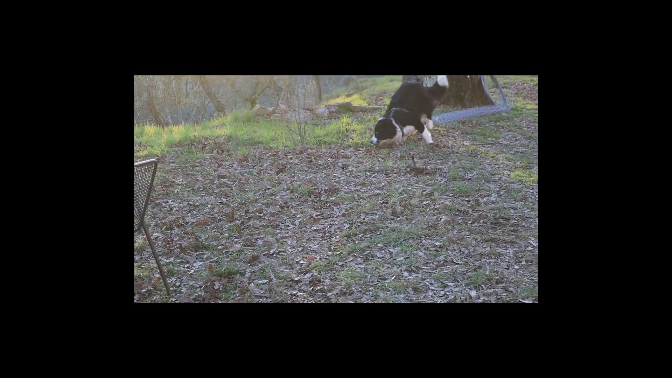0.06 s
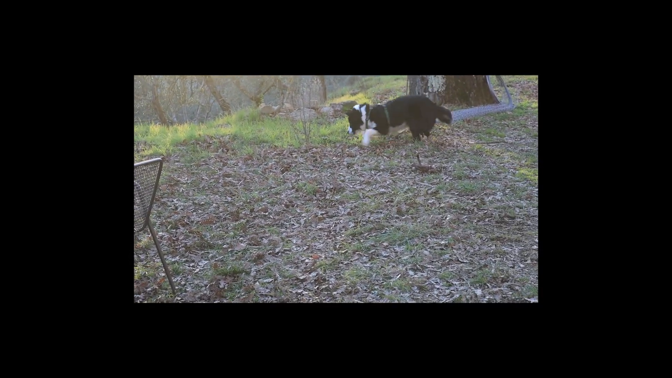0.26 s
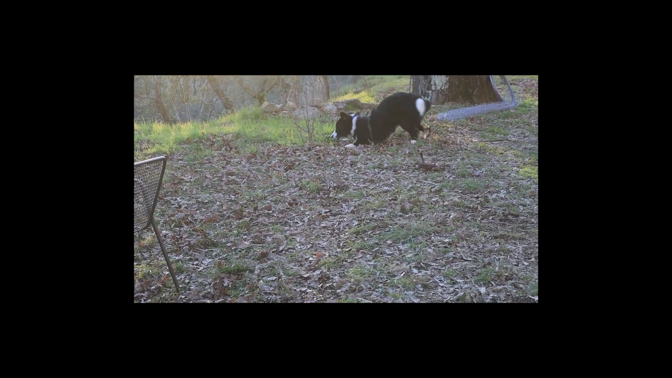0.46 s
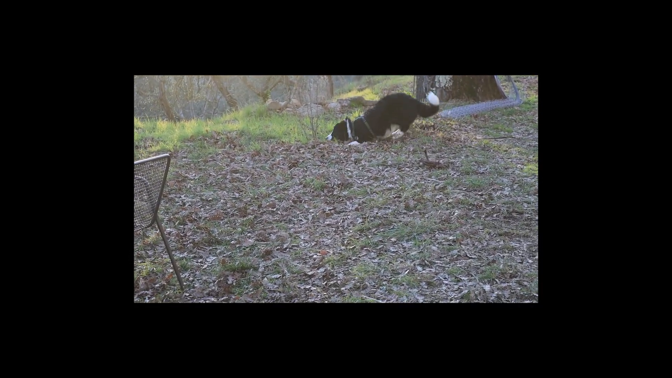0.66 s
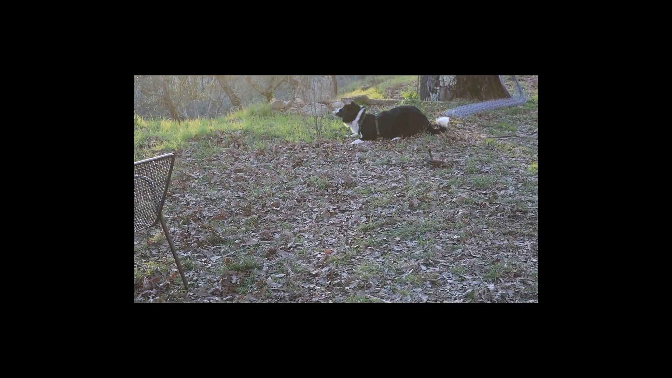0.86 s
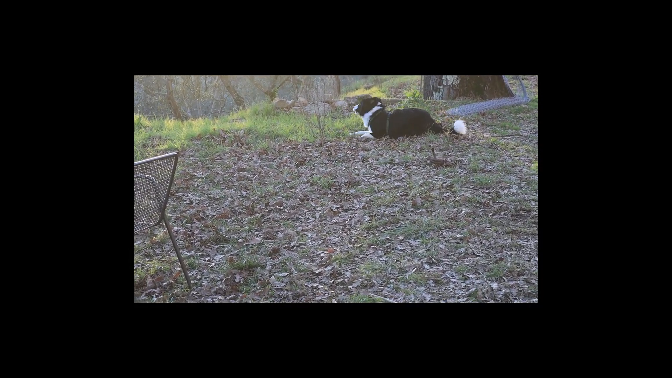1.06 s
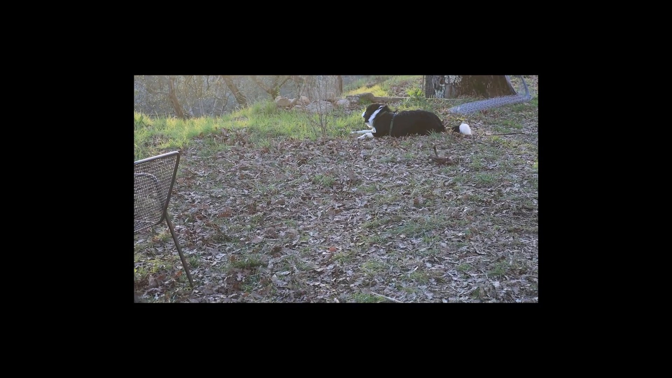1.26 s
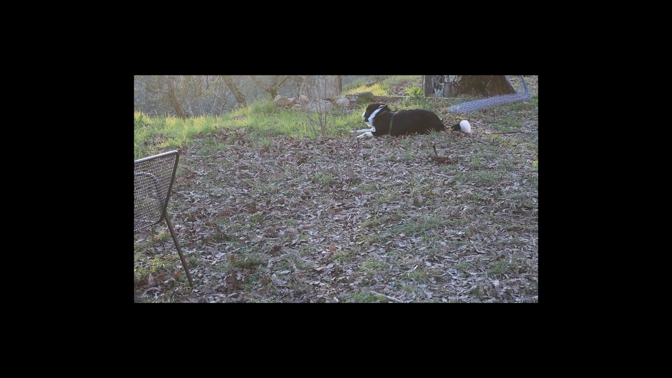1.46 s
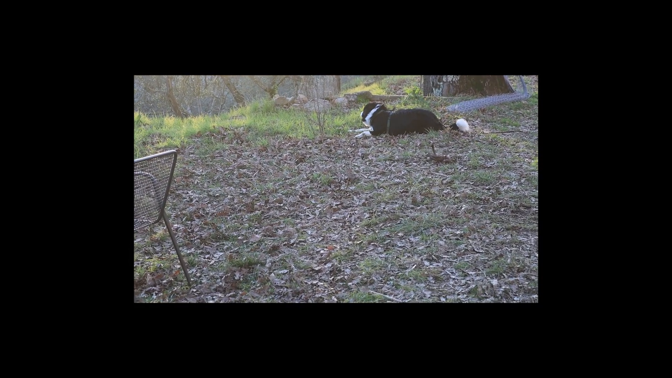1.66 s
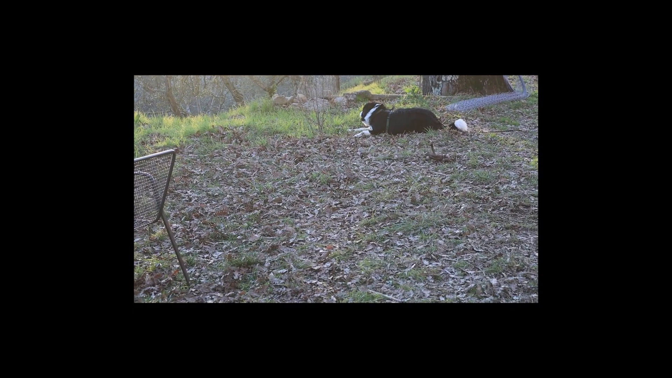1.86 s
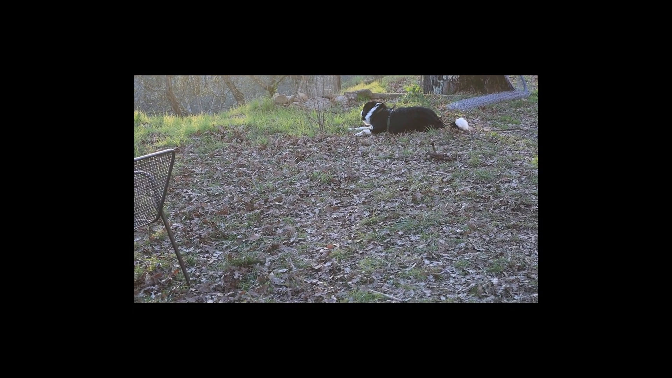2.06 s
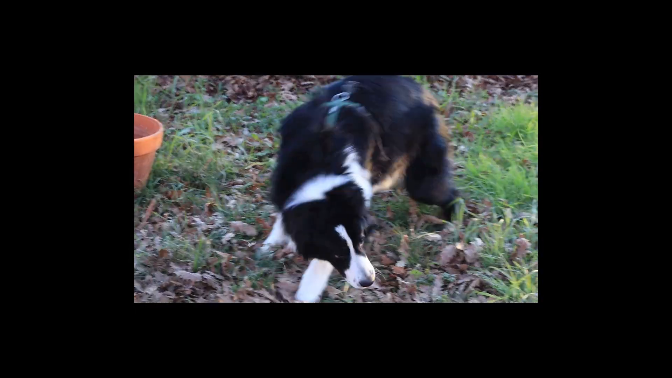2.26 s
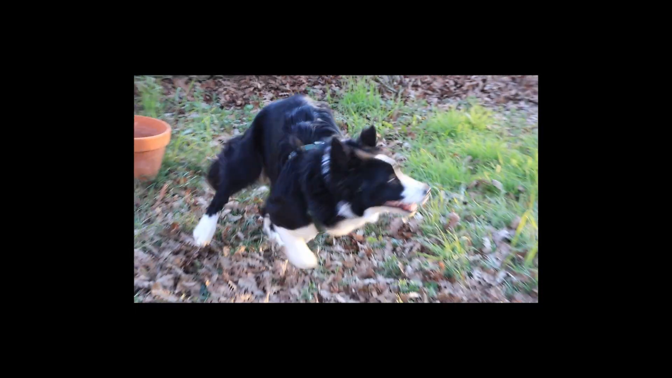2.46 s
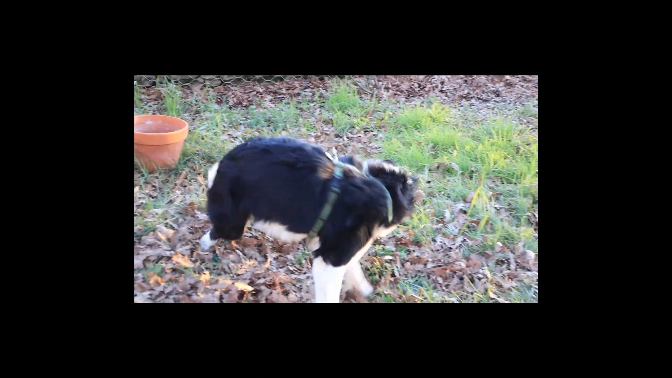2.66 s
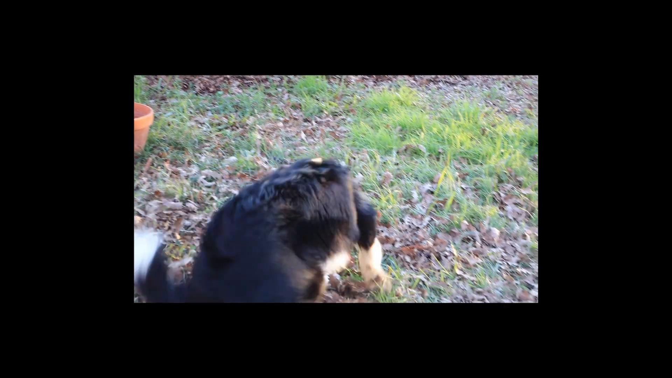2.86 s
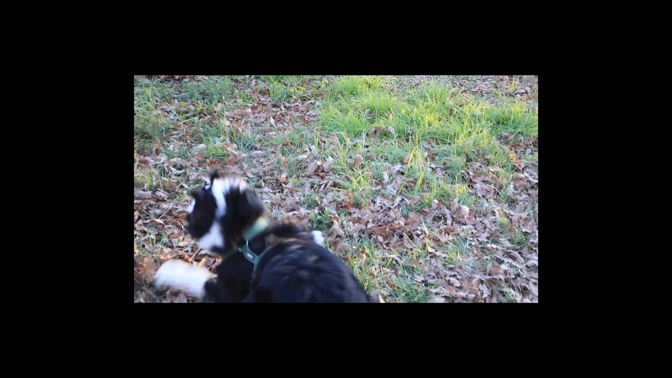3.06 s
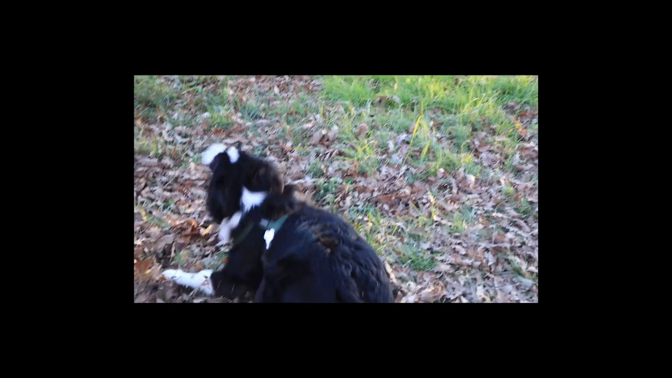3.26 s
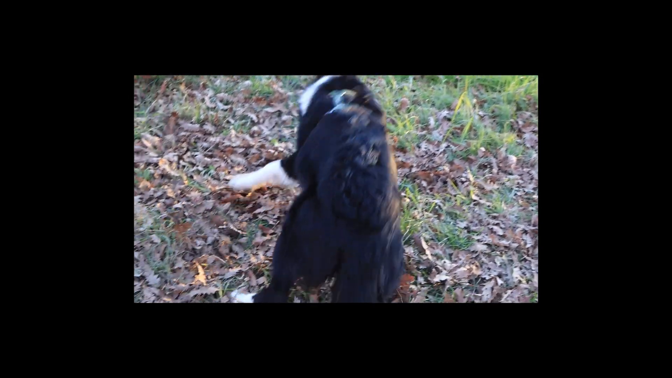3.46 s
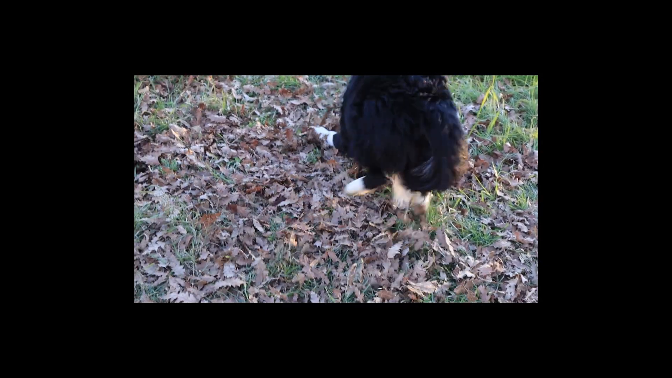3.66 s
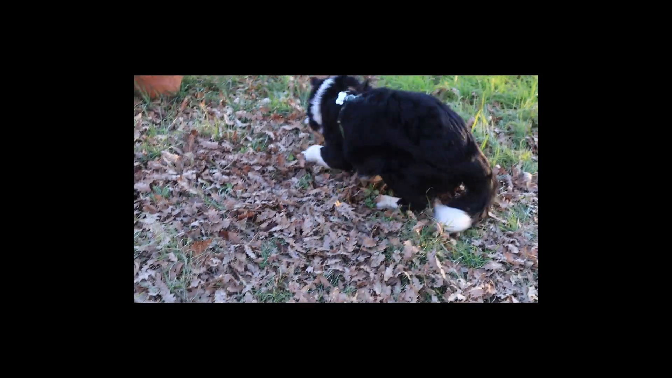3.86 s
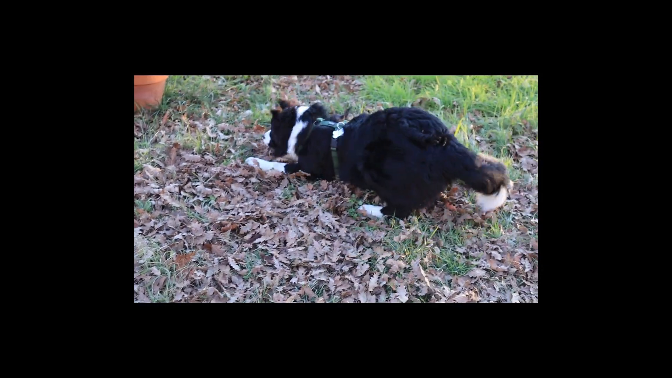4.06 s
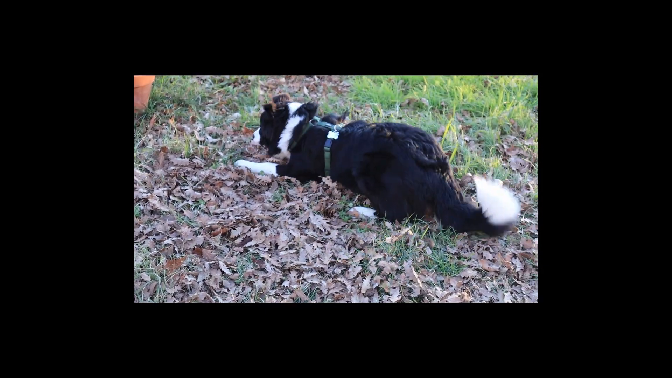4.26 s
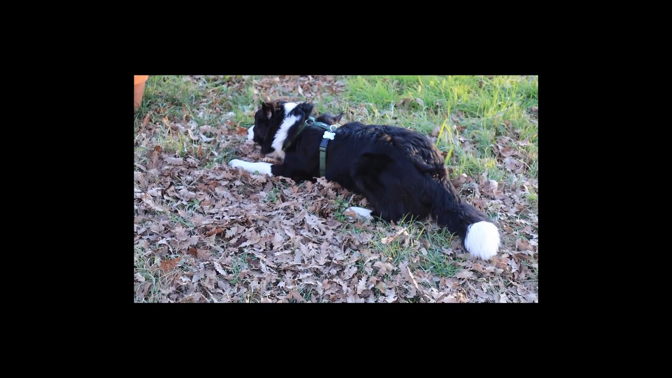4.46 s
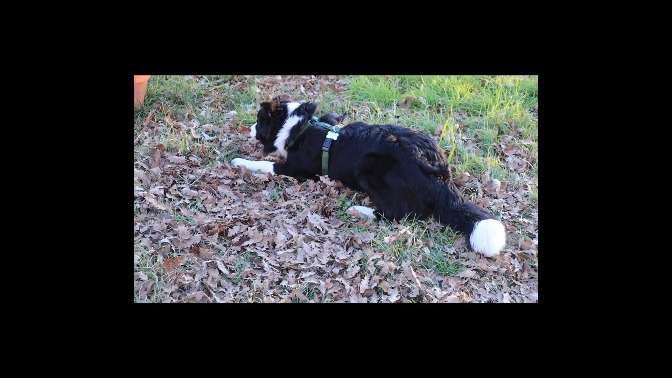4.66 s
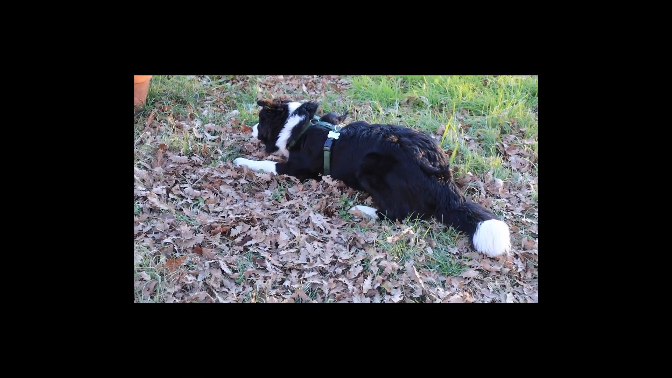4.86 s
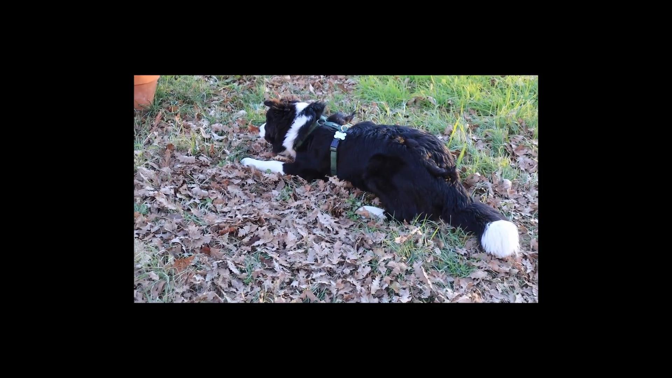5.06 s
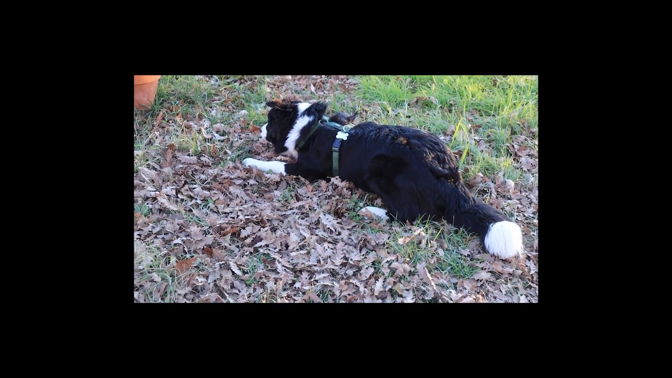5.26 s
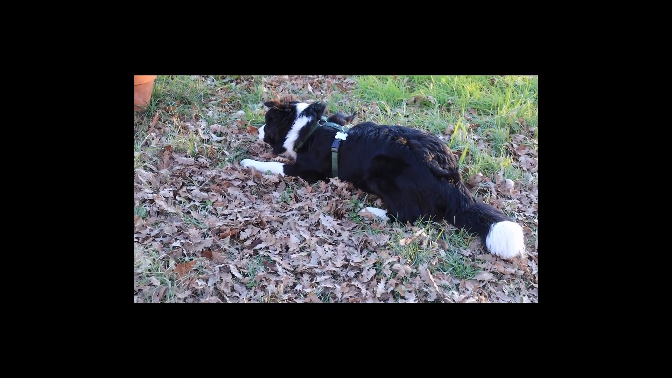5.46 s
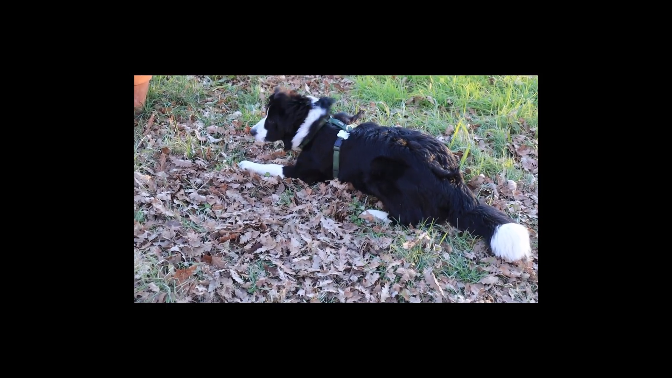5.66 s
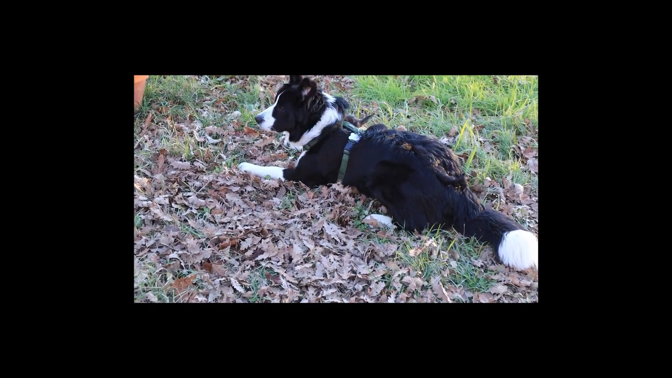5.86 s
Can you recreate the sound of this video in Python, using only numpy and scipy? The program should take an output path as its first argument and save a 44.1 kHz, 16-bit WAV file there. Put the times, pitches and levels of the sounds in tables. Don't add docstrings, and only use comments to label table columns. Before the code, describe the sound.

A quiet garden with soft airy hiss and low wind buffeting. From 0 to about 1.4 s a distant dog's paws scuff dry leaves in soft, uneven swishes, strongest at the start, then it lies still. Around 1.7 s two quick hollow knocks come from far away, briefly resonant and soon damped. At 2.25 s the perspective jumps close: dense, bright, crackling leaf scrambling in irregular bursts, with sharp snaps near 2.85 s. Paws hit the microphone stand at 2.55 and, harder, 2.63 s, making dry cracks and a low shudder. Small metal tags clink, clearest at 2.8 and 3.3 s, again softly near 4.07 s with a low thud. Crisp snaps accompany settling at 4.1-4.45 s. Then near stillness: tiny leaf ticks and a faint, wavering low coo, dropping in pitch, from 4.5 to 5.2 s. A louder tick at 5.7 s and a light rustle end it.

```python
import sys
import numpy as np
from scipy import signal
from scipy.io import wavfile
from scipy.ndimage import uniform_filter1d

SR = 44100
rng = np.random.default_rng(int(sys.argv[2]) if len(sys.argv) > 2 else 0)


def unload_audio(sound):
    columns = np.transpose(np.atleast_2d(sound))
    steps = np.round(np.clip(columns, -1, 1) * 32767)
    wavfile.write(sys.argv[1], SR, steps.astype(np.int16))


def invert_db(x):
    u = np.asarray(x, float) / 20
    return 10 ** u


N = 260631
NEAR_S = 2.247


def evened(x):
    return x / np.sqrt(np.mean(x ** 2) + 1e-20)


def add(mix, s, sound):
    part = mix[round(s * SR):][:len(sound)]
    part += sound[:len(part)]


def coloured(x, points, undo=0):
    hz = np.abs(np.fft.fftfreq(4096, 1 / SR))
    f, db = np.transpose(points)
    log_gain = np.log(invert_db(np.interp(np.log(hz + 1), np.log(f), db))) - undo
    taps = np.fft.ifft(np.exp(np.conj(signal.hilbert(log_gain)))).real
    return signal.oaconvolve(x, taps[:2048])[:N]


def band(x, lo_hz, hi_hz, order=2):
    return signal.sosfilt(signal.butter(order, [lo_hz, hi_hz], "band", fs=SR, output="sos"), x)


def drift(seconds):
    width = max(round(seconds * SR), 2)
    return evened(uniform_filter1d(uniform_filter1d(rng.standard_normal(N), width), width))


def ring(hz, db, t60):
    t = np.arange(round(t60 * SR)) / SR
    return invert_db(db - 60 * t / t60) * np.sin(2 * np.pi * hz * t)


# [Hz, dB].
AIR_SPECTRUM = [(60, -32.5), (110, -13), (240, -10.5), (450, -12), (1200, -19), (2900, -22.5), (5900, -25),
                (16000, -28)]
# [s, dB].
GUSTS = [(0.0, -61), (0.57, -63), (0.73, -59), (1.23, -56.5), (1.45, -70), (2.05, -61), (2.33, -44),
         (2.85, -44), (3.07, -45), (3.29, -57), (3.4, -41), (3.49, -52), (4.09, -50), (4.2, -55),
         (5.11, -55.5), (5.44, -49.5), (5.7, -52), (5.91, -51)]


def air():
    air_db, rumble_db = -65.5, -62.5
    s, db = np.transpose(GUSTS)
    gusts = np.hypot(invert_db(np.interp(np.arange(N) / SR, s, db)), invert_db(rumble_db))
    wind = evened(band(rng.standard_normal(N), 17.8, 47.8, order=3))
    wind += 0.28 * evened(band(rng.standard_normal(N), 50, 150))
    wind *= gusts * invert_db(1.5 * drift(.06) - 5)
    wash = evened(coloured(rng.standard_normal(N), AIR_SPECTRUM))
    return wind + invert_db(air_db + 0.54 * drift(.1)) * wash


# [s, Hz, dB].
COO_LINE = [
    (4.5, 490, -84),
    (4.62, 495, -73),
    (4.73, 495, -70),
    (4.82, 490, -77),
    (4.87, 410, -80),
    (4.95, 405, -74),
    (5.1, 405, -73),
    (5.25, 400, -84),
]


def coo():
    s, hz, db = np.transpose(COO_LINE)
    t = np.arange(N) / SR
    pitch = np.interp(t, s, hz) * (1 + .012 * drift(.03))
    level = invert_db(np.interp(t, s, db, -140, -140) + 3.7 * drift(0.022))
    return level * np.sin(2 * np.pi * np.cumsum(pitch) / SR)


# [Hz, dB, dB, s].
HOLLOW_MODES = [(458, -3, -20, .7), (350, -12, -8, .08), (620, -11, -1, .09), (685, -3, -6, .12),
                (805, -5, 0, .15), (885, -1, -2, .26), (1023, -17, -9, .12), (1170, -17, -10, .14)]
# [s, dB].
HOLLOW_BLOWS = [
    (1.7205, -53.5),
    (1.788, -54),
]


def hollow():
    damped_s, damping_db_per_s = 1.86, 160
    out, t = np.zeros(N), np.arange(6000) / SR
    for blow, (s, db) in enumerate(HOLLOW_BLOWS):
        rise_s = .008 if blow else .001
        for hz, *mode_db, t60 in HOLLOW_MODES:
            sound = ring(hz, db + mode_db[blow], t60 * 1.25)
            attack = np.minimum(np.arange(len(sound)) / SR / rise_s, 1)
            add(out, s + rng.uniform(0, 0.00394), sound * attack)
    echoes = rng.standard_normal(len(t)) * (rng.random(len(t)) < .02) * invert_db(-60 * t / .25)
    out += invert_db(-6) * signal.oaconvolve(out, echoes / np.linalg.norm(echoes))[:N]
    damping_db = damping_db_per_s * np.maximum(np.arange(N) / SR - damped_s, 0)
    return out * invert_db(2.2 * drift(.006) - damping_db)


# [s, dB, Hz, s, s].
STAND_CRACKS = [(2.5487, -14, 930, 0.001, 0.0093), (2.549, -21, 1460, 0.00047, 0.0038),
                (2.549, -18.5, 9800, 0.0007, 0.011), (2.549, -25, 3510, 0.00088, .008),
                (2.549, -32, 5630, 0.00088, .008), (2.55, -25.5, 477, 0.00093, 0.025),
                (4.8925, -55, 460, 0.0011, 0.022), (2.6297, -11, 11000, 0.00044, 0.02),
                (2.6307, -7.5, 5570, 0.0011, .012), (2.6309, -8, 4000, 0.0011, 0.0076),
                (2.631, -12, 3180, 0.00081, 0.0095), (2.631, -19, 880, 0.00064, 0.024),
                (2.631, -28.5, 550, 0.00053, 0.038), (2.631, -19.5, 1840, .001, 0.018),
                (2.635, -17, 4700, .0008, 0.01), (2.652, -33.5, 4850, .003, .03),
                (2.653, -32, 3980, 0.0038, .03), (2.452, -31, 2385, 0.0047, 0.072),
                (2.673, -28, 13000, 0.00073, 0.022)]
# [s, dB, Hz, s].
BODY_THUDS = [(2.549, -23.5, 225, .04), (2.55, -33, 190, 0.2), (2.631, -32.5, 194, .19),
              (2.6335, -22.5, 95, .05), (2.6415, -33, 65, 0.1), (2.697, -30, 75, .05), (2.4, -45, 170, .2),
              (3.34, -46, 230, .08), (3.52, -44, 110, .1), (2.631, -26, 290, 0.062),
              (4.075, -34.5, 200, .05), (4.078, -42, 323, 0.043), (3.62, -44.5, 132, 0.12),
              (5.68, -54, 135, .15)]


def knocks():
    out, t = np.zeros(N), np.arange(1024) / SR
    for (s, db, hz, rise, t60), noise in zip(STAND_CRACKS, rng.standard_normal((len(STAND_CRACKS), 1024))):
        tone = np.sin(2 * np.pi * hz * t) + 0.68 * evened(band(noise, hz * 0.67, hz * 1.3))
        crack = tone * np.minimum(t / rise, 1) * invert_db(-60 * np.maximum(t - rise, 0) / t60)
        add(out, s, invert_db(db) * crack / abs(crack).max())
    for s, db, hz, t60 in BODY_THUDS:
        add(out, s, ring(hz, db, t60))
    return out + sway()


def sway():
    peak_s, caught_s, sway_db, sway_hz = 2.6525, 2.708, -25.5, 43.5
    t = np.arange(N) / SR - peak_s
    swing_db = sway_db - 60 * abs(t) / np.where(t < 0, .12, .4)
    swing_db -= 9 * np.clip((t + peak_s - caught_s) / 0.0054, 0, 1)
    onset = np.clip((t + .5 / sway_hz) / 0.0025, 0, 1)
    return invert_db(swing_db) * np.sin(2 * np.pi * sway_hz * t) * onset


# [Hz, dB, s].
TAG_MODES = [(6250, -2, 0.11), (6500, -11, 0.091), (7530, 1, 0.086), (9270, -13, 0.08), (9560, -5, 0.043),
             (13360, -5, 0.068), (13720, -2, 0.043)]
# [s, dB, dB, dB, dB].
TAG_CLINKS = [
    (2.247, -52, -20, -20, 0),
    (2.456, -40, -12, -20, 2),
    (2.778, -28, -15, 0, -20),
    (3.2909, -28, 0, 0, 0),
    (4.066, -37, 3, -10, -15),
]


def tags():
    out = np.zeros(N)
    for s, db, low_db, mid_db, high_db in TAG_CLINKS:
        for hz, mode_db, t60 in TAG_MODES:
            favour_db = low_db if hz < 7000 else mid_db if hz < 8000 else high_db
            add(out, s, ring(hz, db + mode_db + favour_db, t60))
    return out


# [s, dB, Hz].
PAW_SNAPS = [(2.0308, -46, 5570), (2.4975, -33, 8100), (2.739, -19, 3200), (2.8378, -12, 7400),
             (2.86, -13, 3900), (3.3543, -30, 2800), (3.4666, -18, 7640), (3.78, -16, 8400),
             (4.1174, -19, 7600), (4.128, -17.5, 7060), (4.1542, -21.5, 6850), (4.3142, -24, 8300),
             (4.3216, -22.5, 8200), (4.3282, -30, 8440), (4.3428, -22, 8100), (4.3535, -22, 8100),
             (4.384, -22, 7740), (4.4229, -26, 7900), (4.4501, -28, 8500)]
# [s, dB, Hz].
SPRING_TICKS = [(4.495, -43, 2300), (4.54, -32.5, 5000), (4.58, -41, 7800), (4.652, -31, 6700),
                (4.731, -32.5, 3400), (4.8315, -35, 7800), (4.8932, -32.5, 1590), (4.925, -41, 5000),
                (4.936, -42, 7200), (4.96, -38, 3600), (5.0163, -41, 7800), (5.111, -45, 3480),
                (5.1522, -45, 6700), (5.3614, -44.5, 7800), (5.375, -42, 2830), (5.4215, -32.5, 8200),
                (5.447, -37, 5200), (5.4684, -28, 7400), (5.4893, -45, 5000), (5.514, -37, 4000),
                (5.61, -37, 8000), (5.686, -21, 3270)]


def snaps():
    snap_top_db, tick_top_db = -3, -7
    out, t = np.zeros(N), np.arange(256) / SR
    rows = [(*row, snap_top_db) for row in PAW_SNAPS] + [(*row, tick_top_db) for row in SPRING_TICKS]
    for (s, db, hz, top_db), tick in zip(rows, rng.standard_normal((len(rows), 256))):
        tick = tick * invert_db(-60 * t / 0.002)
        burst = evened(band(tick, hz * 0.5, 10500)) + invert_db(top_db) * evened(band(tick, 6600, 16000))
        burst = burst / abs(burst).max() + .55 * np.sin(2 * np.pi * hz * t) * invert_db(-60 * t / 0.006)
        add(out, s, invert_db(db - 4.5) * burst / abs(burst).max())
    return out


# [s, dB].
CREEP = [(0.0, -52), (0.2, -59), (0.45, -52.5), (0.65, -65), (1.15, -53.5), (1.45, -70.5), (2.247, -53.5),
         (2.34, -44), (2.96, -43.5), (3.12, -50), (3.3, -43.5), (3.62, -42), (3.85, -47), (4.08, -36.5),
         (4.24, -61.5), (4.75, -64.5), (5.4, -68), (5.91, -46)]
# [s, dB, s].
FAR_STEPS = [
    (0.039, -41.5, 0.05),
    (0.219, -45, 0.014),
    (0.355, -48.5, 0.014),
    (0.472, -43, 0.022),
    (0.53, -52, 0.021),
    (0.685, -52, 0.065),
    (0.808, -49, 0.029),
    (1.034, -62, 0.064),
    (1.128, -49.5, 0.06),
    (1.327, -54.5, 0.038),
]
# [s, dB, s, s].
PAW_SCRAMBLE = [(2.29, -31, 0.0091, 0.018), (2.368, -33.5, 0.02, 0.038), (2.454, -42.5, 0.013, 0.035),
                (2.539, -32, 0.0031, 0.017), (2.609, -30.5, 0.01, 0.02), (2.715, -24, 0.0053, 0.0055),
                (2.78, -28.5, 0.051, 0.035), (2.837, -32, 0.012, 0.009), (2.859, -31, 0.011, 0.027),
                (2.89, -26.5, 0.004, 0.084), (2.949, -29, 0.003, 0.052), (3.023, -29.5, 0.068, 0.025),
                (3.113, -27, 0.011, 0.0051), (3.176, -24, 0.0073, 0.015), (3.225, -28.5, 0.091, 0.032),
                (3.392, -47.5, 0.008, 0.013), (3.559, -36, 0.052, 0.032), (3.617, -35, 0.0085, 0.009),
                (3.642, -28.5, 0.026, 0.071), (3.708, -30, 0.0094, 0.033), (3.781, -41, 0.11, 0.013),
                (3.821, -33, 0.007, 0.046), (3.845, -29, 0.011, 0.004), (3.912, -40, 0.026, 0.11),
                (3.984, -37.5, 0.012, 0.037), (4.076, -31.5, 0.0068, 0.021)]
# [s, dB, s, s].
BODY_SETTLING = [(4.171, -48, 0.048, 0.0037), (4.251, -50, 0.094, 0.13), (4.322, -40.5, 0.017, 0.006),
                 (4.341, -43, 0.008, 0.083), (4.385, -40.5, 0.0024, 0.006), (4.423, -46.5, 0.028, 0.0055),
                 (4.54, -52, 0.016, 0.0054), (4.577, -50.5, 0.004, 0.0075), (4.653, -54, 0.054, 0.046),
                 (5.547, -54, 0.022, 0.074), (5.624, -50, 0.035, 0.039), (5.663, -46.5, 0.011, 0.083),
                 (5.752, -49, 0.003, 0.006), (5.799, -45.5, 0.039, 0.038)]


def stirring(t):
    still_s, step_fall_s = 1.6, 0.044

    def bands(db, peak_db, top_db, heavy_db=0):
        body_db = -11 + heavy_db - 0.2159 * (peak_db + 40)
        return invert_db(np.array([db + body_db, db - 1.5, db + 0.38 * top_db + 2.0, db + top_db])) ** 2

    bed_db = np.interp(t, *np.transpose(CREEP))
    power = bands(bed_db, bed_db, -9.5, heavy_db=1)
    steps = [(*row, step_fall_s) for row in FAR_STEPS]
    for rows, top_db in (steps, -7.5), (PAW_SCRAMBLE, -6.5), (BODY_SETTLING, -9.5):
        for s, db, rise, fall in rows:
            away = np.where(t < s, (s - t) / max(rise, .002), (t - s) / max(fall, .002))
            power += bands(db - 6 * away ** 1.5, db, top_db)
    return np.sqrt(power) * ((t < still_s) | (t >= NEAR_S))


def crack_shapes():
    u = np.arange(160) / SR
    hz = np.geomspace(500, 15000, 32)[:, None]
    ticks = .5 * rng.standard_normal((32, 160)) * invert_db(-60 * u / .002)
    return ticks + np.sin(2 * np.pi * hz * u) * invert_db(-60 * u * np.sqrt(hz) / .25)


def leaf_patches(count):
    patches = uniform_filter1d(rng.standard_normal((count, 32)), 50, axis=0)
    patches = uniform_filter1d(patches, size=3, axis=1)
    patches = invert_db(1.8 * evened(patches))
    return patches / np.sqrt((patches ** 2).mean(1, keepdims=True))


# [Hz, dB].
LEAF_SPECTRUM = [(60, -13.5), (200, -5.5), (400, -4), (800, -2.5), (1400, -3), (2500, -5), (4700, -5),
                 (6000, -9), (8000, 0.5), (8900, -7), (10100, -11), (12800, 1.5), (15000, -9), (16000, -10)]


def leaves():
    t = np.arange(N) / SR
    near, coarse = t >= NEAR_S, t[::32]
    cracks_per_s = np.where(near, 14000, 16000)
    spread_db, clump_db = np.where(near, 2.3, 1.5), np.where(near, 1.0, .8)
    busy_db, fewest = -54, .06
    shapes, levels = crack_shapes(), stirring(coarse)

    share = np.where(near, np.clip(np.interp(t, coarse, levels[1]) / invert_db(busy_db), fewest, 1), 1)
    hit = rng.random(N) < share * cracks_per_s / SR
    size = hit / np.sqrt(share) * invert_db(spread_db * np.minimum(rng.exponential(1, N), 4.5))
    size *= rng.choice([-1, 1], N)
    kind = rng.integers(0, len(shapes), N)
    size *= leaf_patches(len(coarse))[np.arange(N) // 32, kind]

    crackle = sum(signal.oaconvolve(size * (kind == k), shape)[:N] for k, shape in enumerate(shapes))
    crackle /= np.where(near, np.std(crackle[near]), np.std(crackle[~near]))
    crackle *= invert_db(clump_db * drift(.004))
    uneven = np.log((abs(np.fft.fft(shapes, 4096)) ** 2).mean(0)) / 2
    crackle = coloured(crackle, LEAF_SPECTRUM, uneven)
    edges = [(50, 1300), (1300, 6500), (6500, 9500), (9500, 17000)]
    parts = [evened(band(crackle, *pair, order=3)) for pair in edges]
    return sum(part * np.interp(t, coarse, level) for part, level in zip(parts, levels))


def scene():
    return (air() + coo() + hollow() + knocks() + tags() + snaps() + leaves())[None]


def roll_off(x):
    return signal.sosfilt(signal.butter(12, 16670, fs=SR, output="sos"), x)


def record(dry):
    low_pass = signal.firwin(511, 16000, window=("kaiser", 9), fs=SR)
    mix = signal.oaconvolve(dry, low_pass[None], "same")
    return roll_off(mix)


dry = scene()
out = record(dry)
unload_audio(out)
```